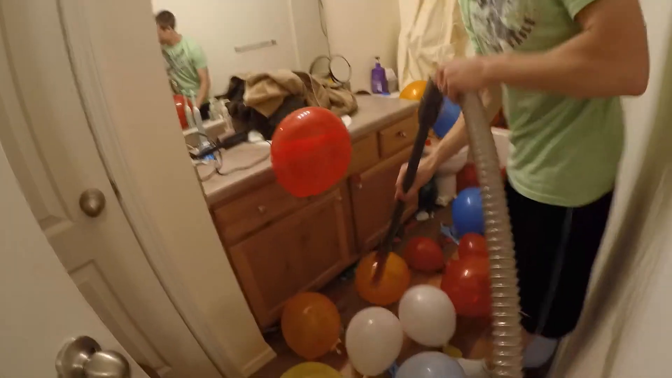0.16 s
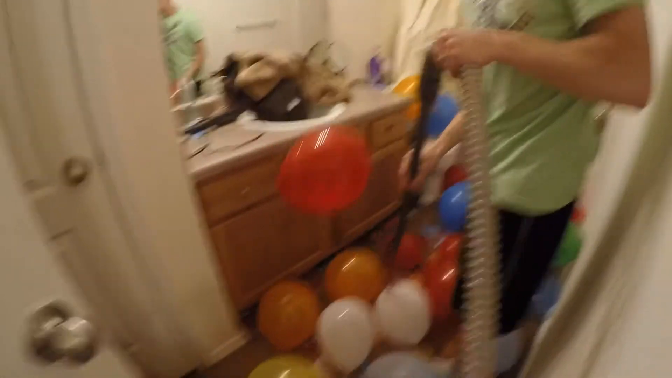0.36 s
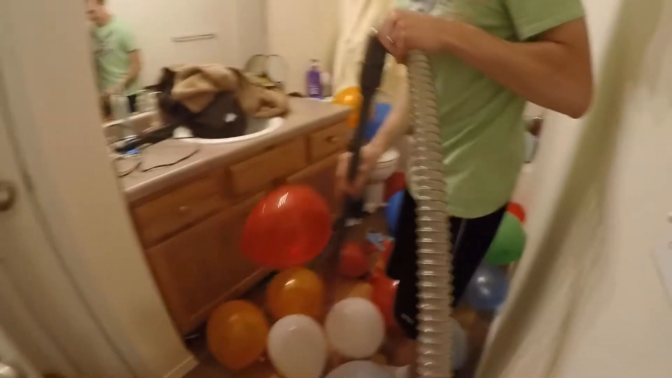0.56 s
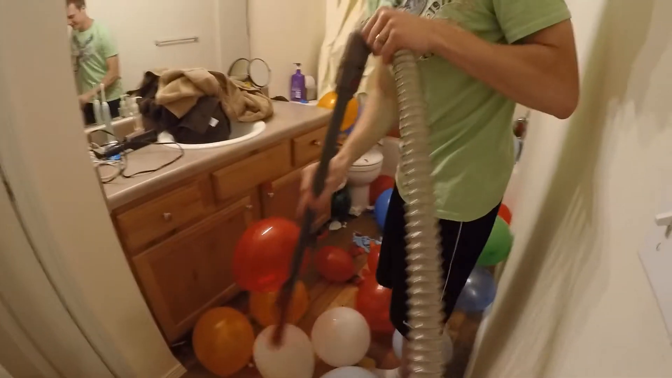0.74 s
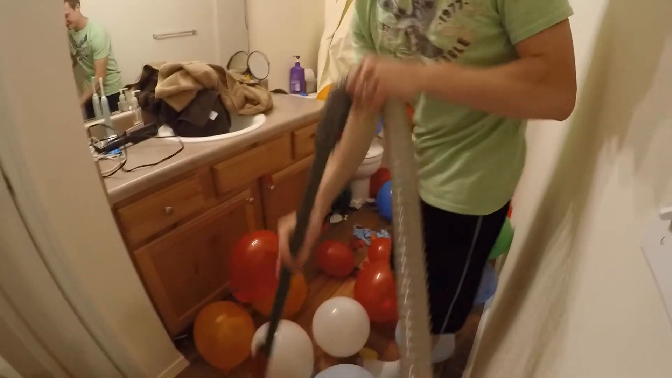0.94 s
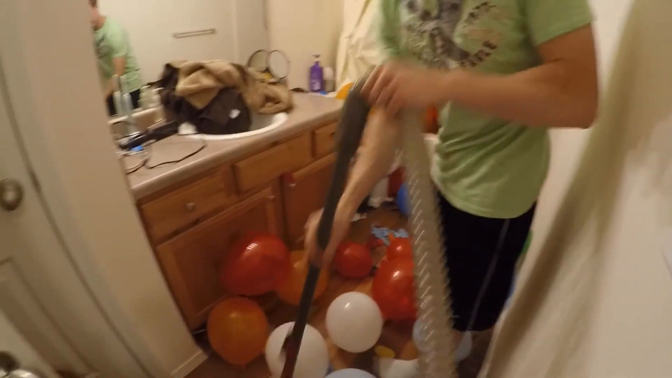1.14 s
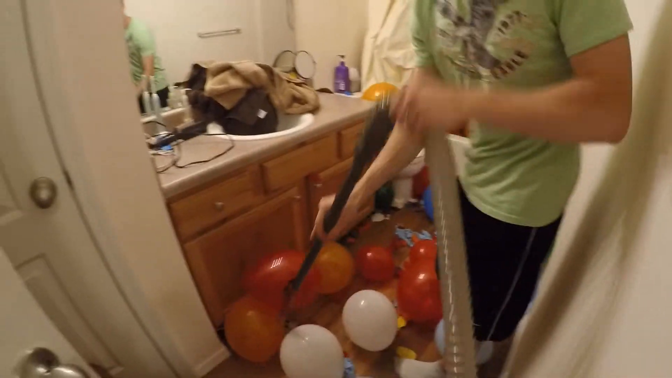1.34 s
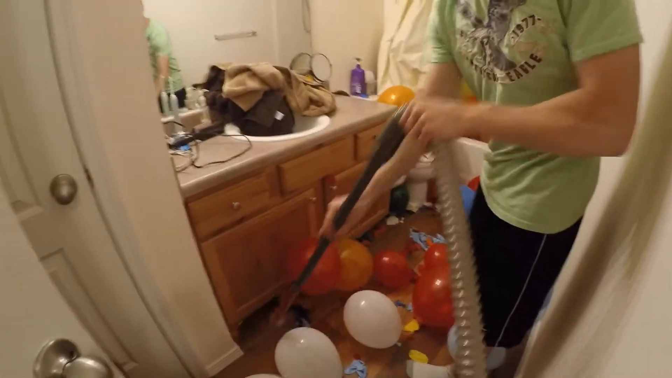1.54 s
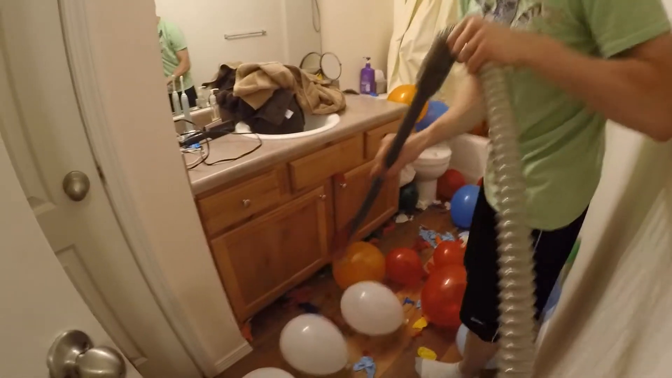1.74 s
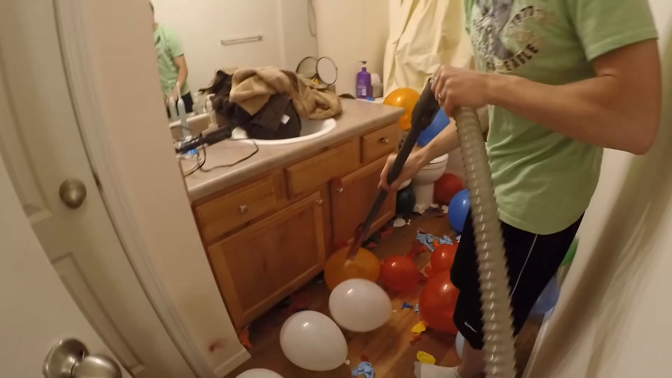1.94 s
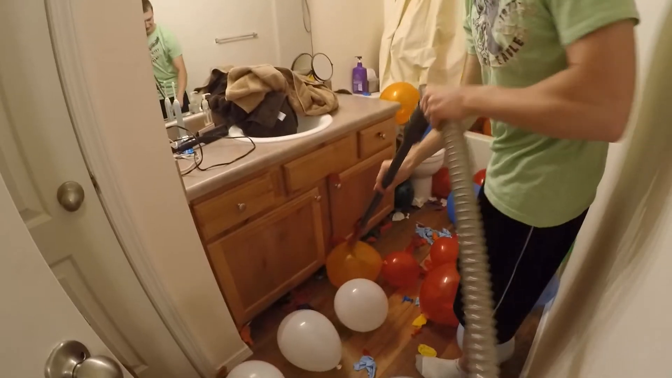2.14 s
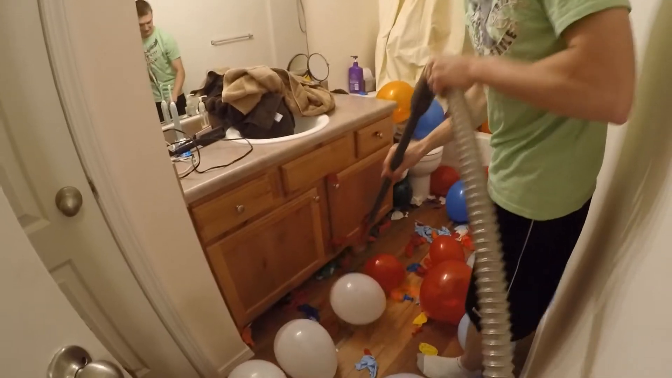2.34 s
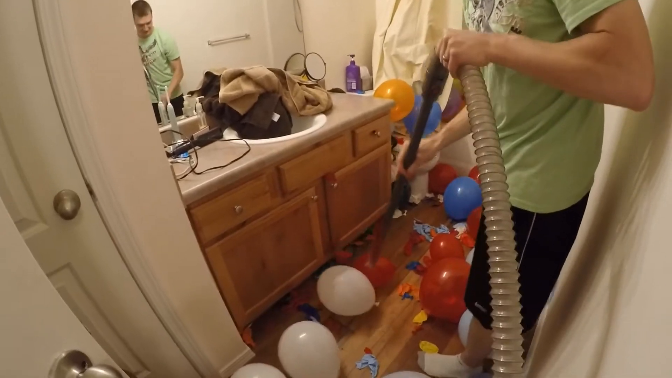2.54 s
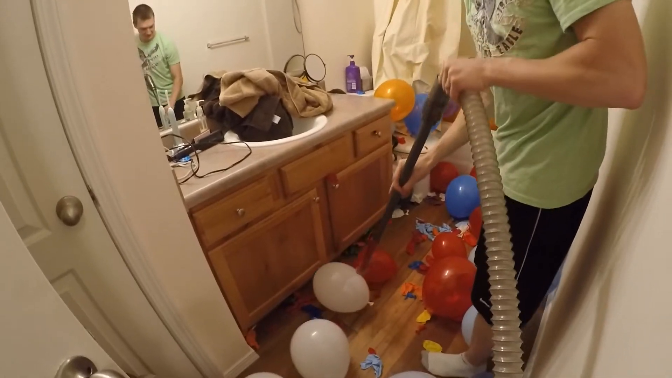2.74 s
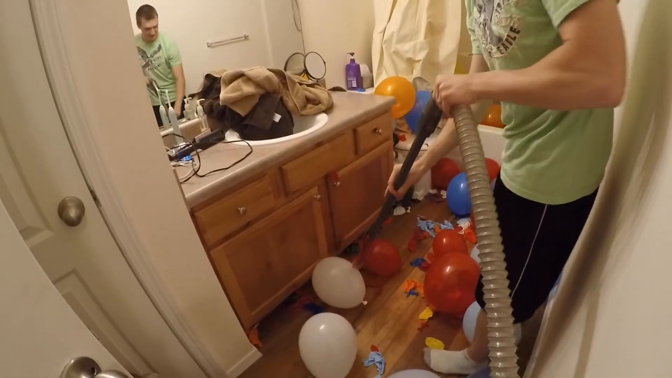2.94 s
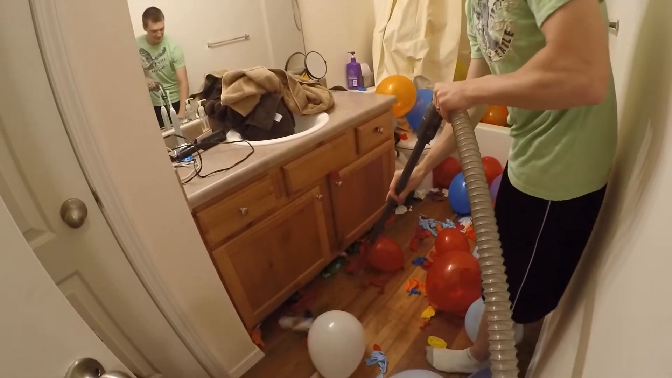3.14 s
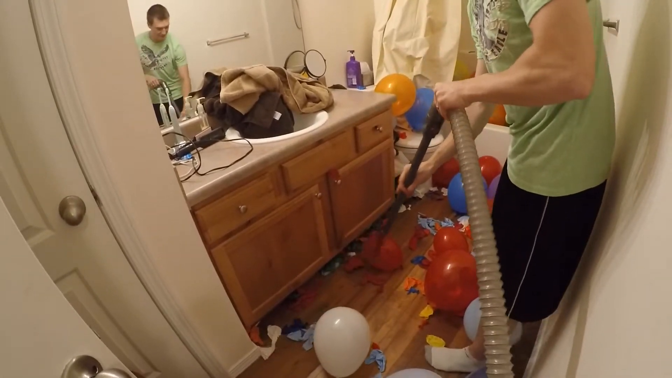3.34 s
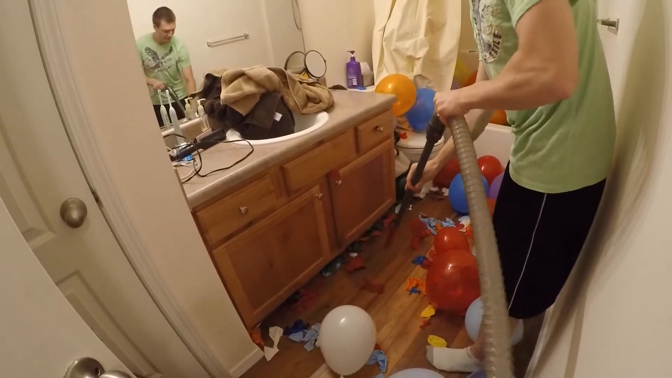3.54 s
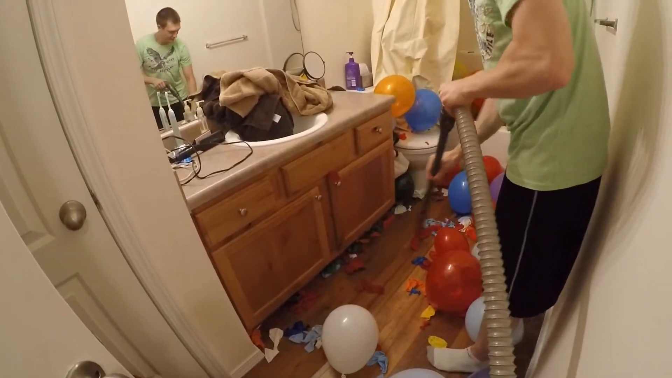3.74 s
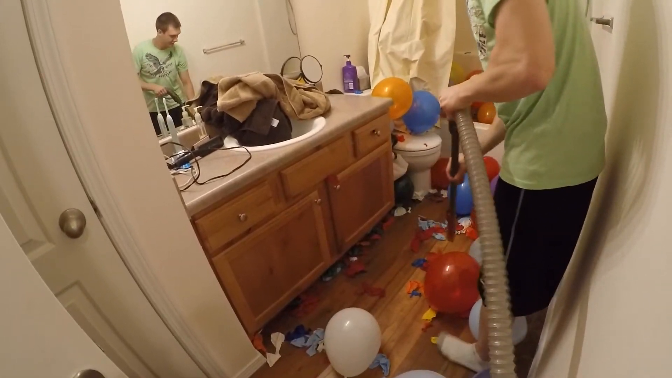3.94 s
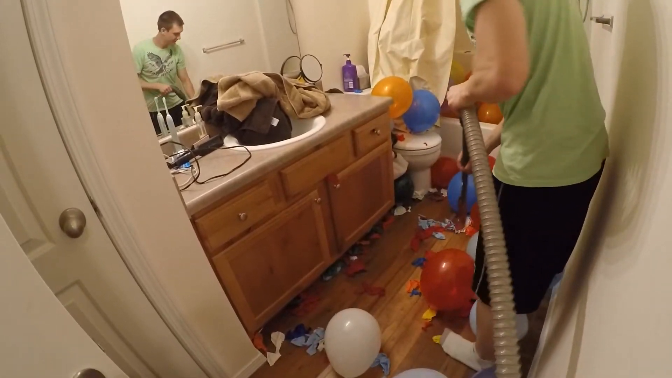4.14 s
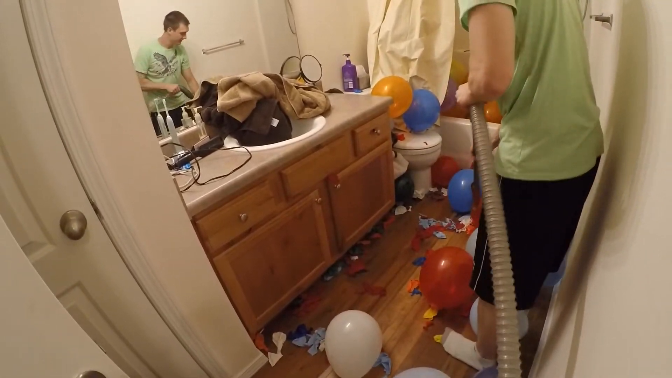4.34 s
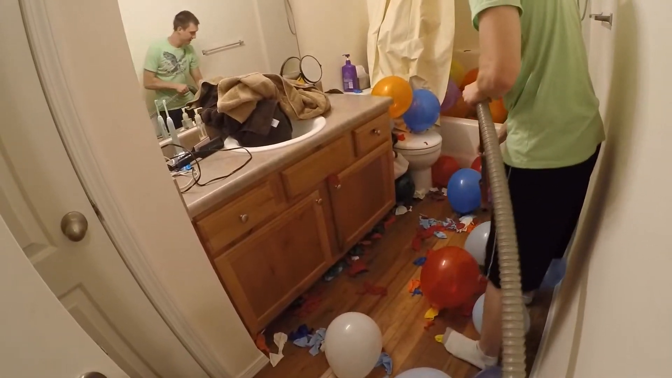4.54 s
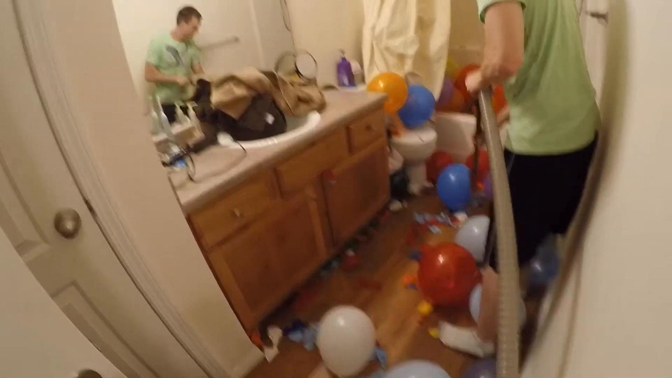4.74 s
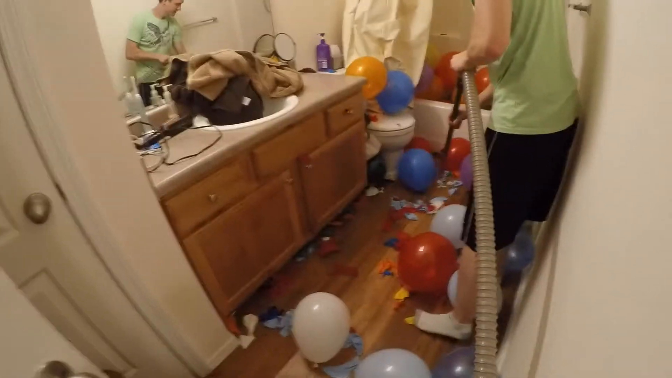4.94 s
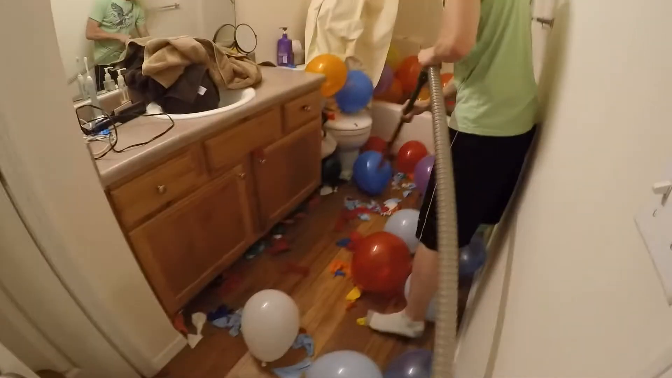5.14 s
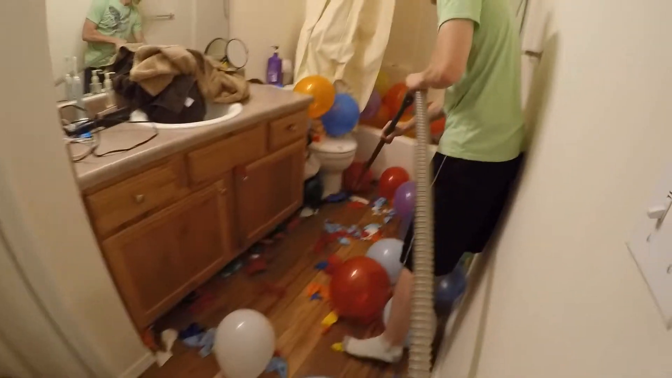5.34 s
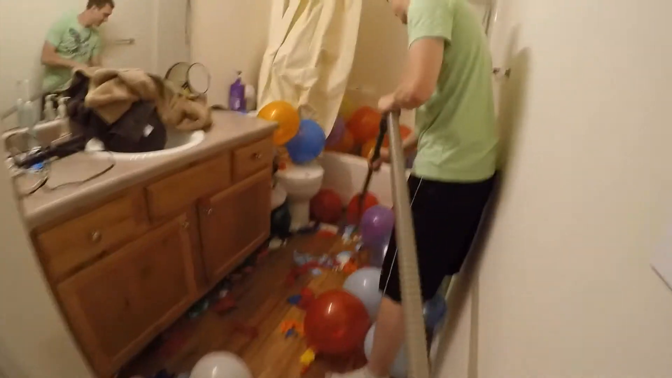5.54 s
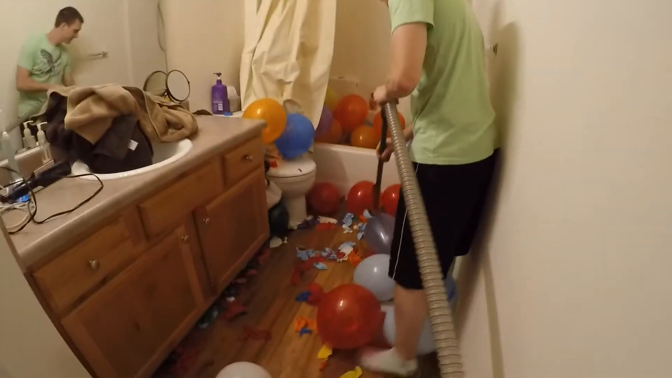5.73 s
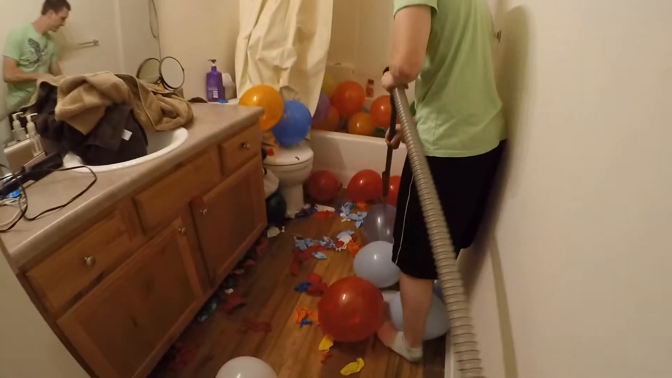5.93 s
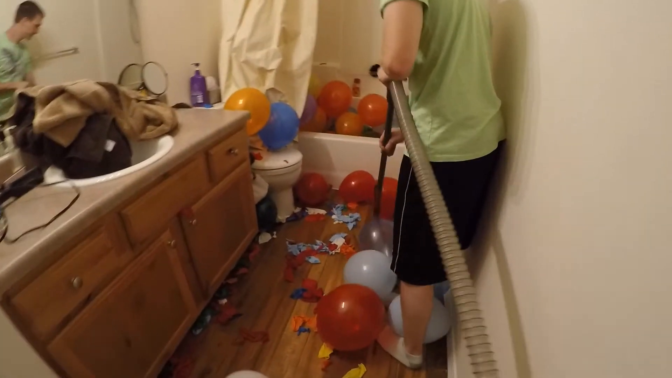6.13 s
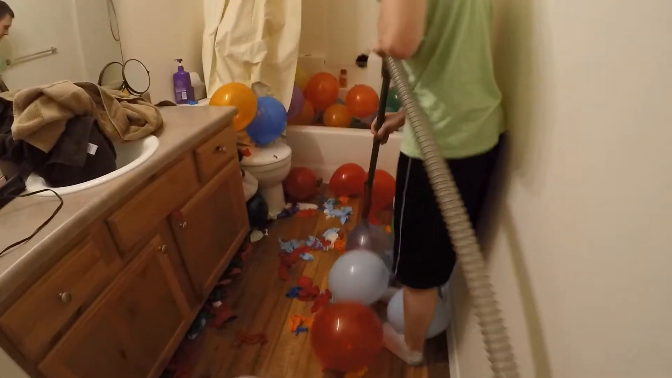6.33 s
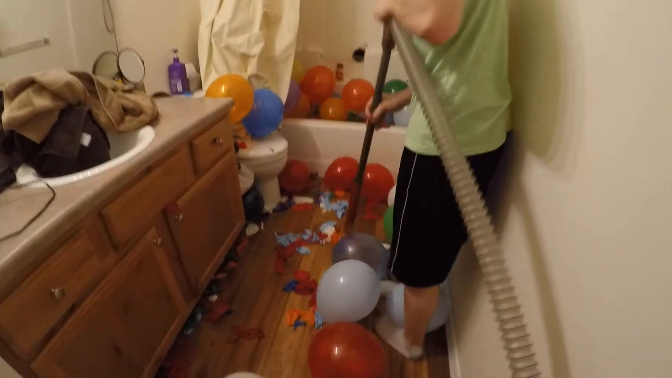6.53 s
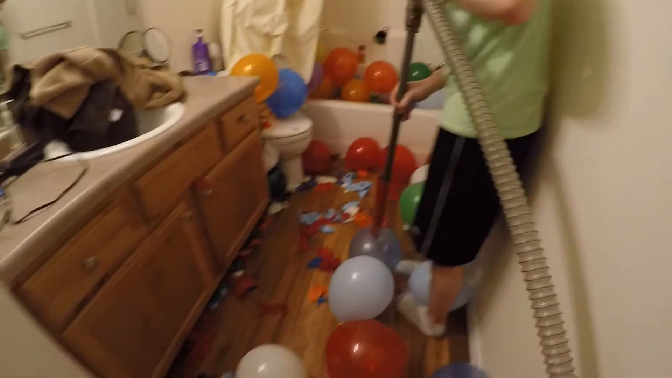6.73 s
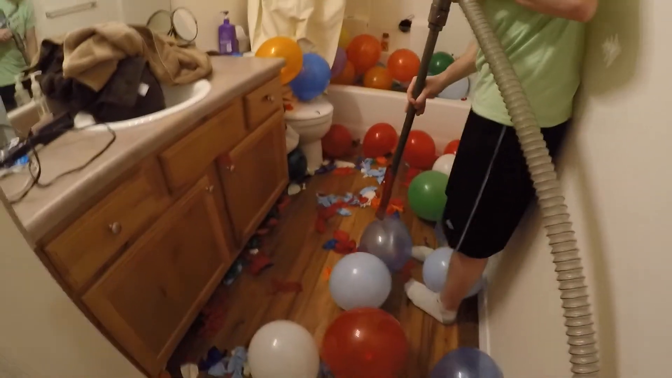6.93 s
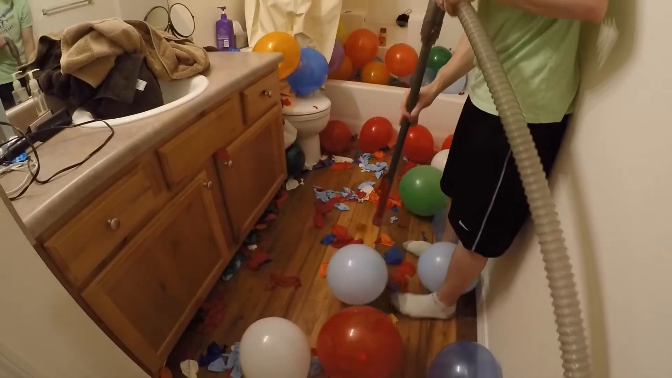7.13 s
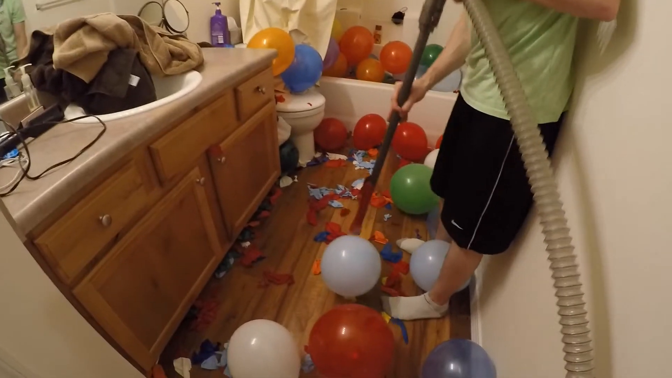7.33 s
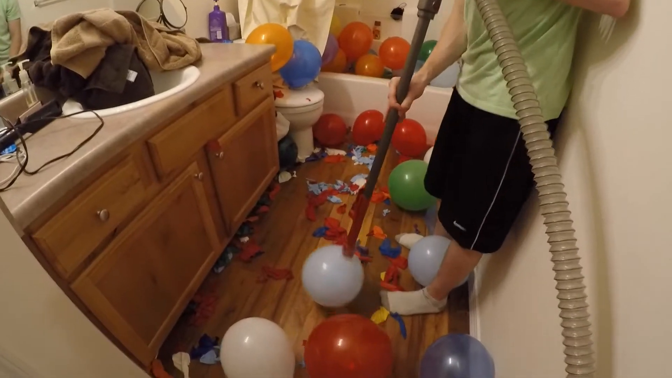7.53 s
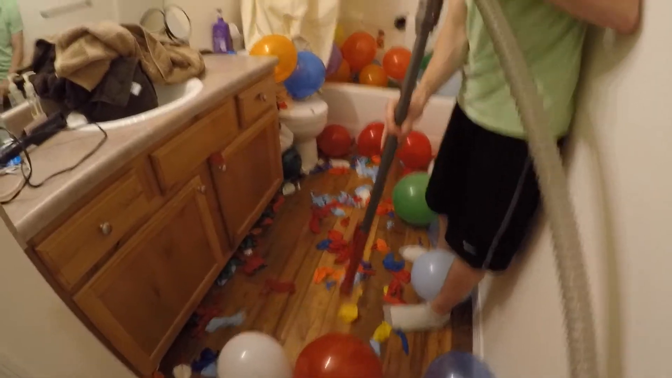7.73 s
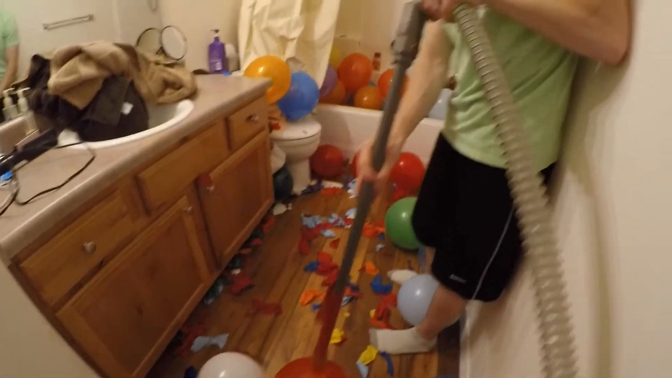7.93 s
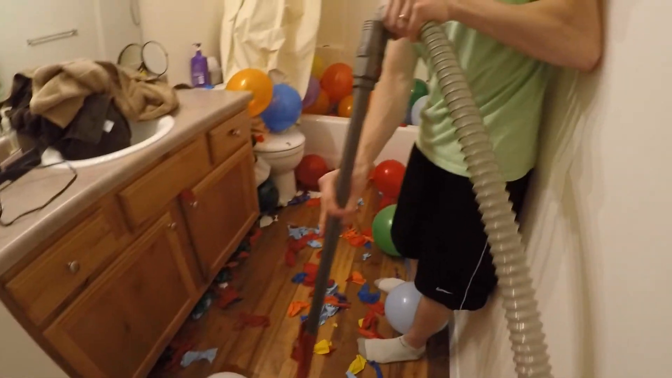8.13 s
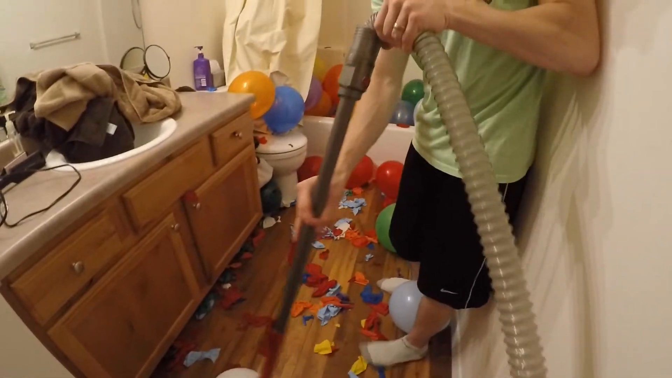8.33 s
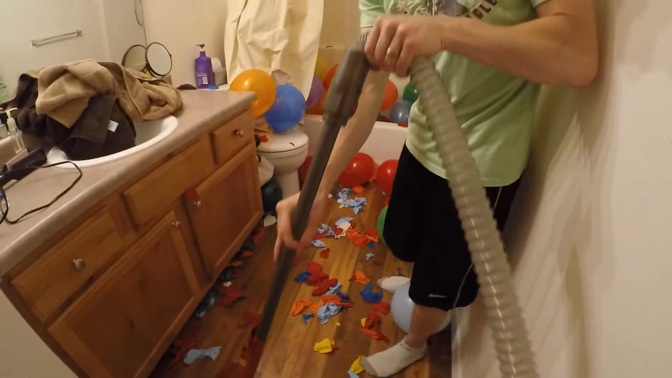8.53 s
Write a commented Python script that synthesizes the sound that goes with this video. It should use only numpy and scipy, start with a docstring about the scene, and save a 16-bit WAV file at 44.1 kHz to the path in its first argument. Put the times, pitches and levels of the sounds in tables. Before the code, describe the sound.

Balloon after balloon pops with a sharp, ringing bang over the rushing air and whine of a running vacuum cleaner.

```python
"""A vacuum cleaner runs in a small bathroom, its wand sucking up balloons and bursting them one by one.
Air roars in the hose and hisses at the nozzle, rushing harder round a caught balloon and sagging while
a torn skin goes down the hose. Each burst is a low thump and a crack that rings in the room; rubber
scraps slap, feet and wand knock. The camera's gain control ducks just ahead of every bang, the peak
clips, and the roar swells back."""
import sys
import numpy as np
from scipy import signal
from scipy.fft import rfft, irfft, next_fast_len
from scipy.io import wavfile
from scipy.ndimage import uniform_filter1d

SR = 44100
rng = np.random.default_rng(int(sys.argv[2]) if len(sys.argv) > 2 else 0)


def wav_record(signal):
    """Record a signal, one row per channel, as 16-bit PCM in the file named by sys.argv[1]."""
    frames = np.transpose(np.atleast_2d(signal))
    bounded = np.clip(frames, -1, 1)
    # unit amplitude maps onto the largest positive 16-bit level
    quanta = np.round(bounded * 32767).astype(np.int16)
    wavfile.write(sys.argv[1], SR, quanta)


N = 382788
TIME = np.arange(N) / SR

# balloon bursts: t/s, thump/Hz, bang/dB, brightness/(dB/octave), knock/Hz, ring/Hz, ring/dB, choke/dB
BURSTS = [(-0.075, 189, -33, -0.5, 351, 1750, -20, 0), (0.9499, 157, -33, -1.6, 323, 1120, -22.5, 3.5),
          (1.3923, 210, -31.5, -1, 477, 1590, -30, 2), (1.7119, 211, -32, 0, 494, 1700, -22.5, 2.5),
          (2.2252, 205, -32.5, 0.67, 454, 1710, -15, -0.5), (3.0593, 188, -33.5, -0.2, 403, 1360, -20, 2),
          (3.439, 220, -33.5, 0, 485, 1640, -19, -0.5), (3.8598, 199, -34, 0, 465, 1470, -15.5, -0.5),
          (4.4651, 201, -30.5, -0.1, 396, 1760, -21.5, 5), (5.2065, 204, -32, 0.2, 474, 1640, -40, 1),
          (5.619, 188, -33, 1.6, 311, 1960, -17, 4), (7.051, 183, -31.5, -0.6, 670, 1420, -15, 7),
          (7.5951, 183, -33, 0, 642, 2000, -22.5, 0.5), (8.004, 149, -33, 0.5, 677, 1600, -19.5, 1.5),
          (8.558, 190, -33.5, -0.6, 555, 1240, -24, -1)]
# how far the wand is turned away toward the tub: t/s, share/0-1
WAND_TURN = [(5.1, 0.55), (5.6, 0.8), (7.0, 0.87), (8.4, 0.5)]


def vacuum_cleaner():
    """One air flow drives the roar, the rush and the tones; the motor hums steadily underneath."""
    # strength of the unblocked flow: t/s, level/dB
    suction = [(0.2, -41), (1.6, -39.5), (2.1, -42.5), (3.0, -41.5), (4.3, -38), (5.6, -39), (6.4, -43.5),
               (7.0, -40), (7.5, -39.5), (8.5, -40)]
    # roar of the air in the hose: f/Hz, density/dB
    hose = [(700, -17), (1080, -11), (1300, -4), (1700, 0.5), (2080, -4), (2220, -5), (2420, -3),
            (2580, -14.5), (3300, -23), (6000, -44)]
    away = automation(WAND_TURN)
    flow = from_db(automation(suction) - choking())
    rush = wand_rush(away) * from_db(catching())
    roar = from_db(-2.9 * away) * airflow(hose, flutter_db=2.5)
    tones = whine_and_whistle(away)
    hum = from_db(-62) * tone(hz=124, waver=0.0035, flicker_db=4)
    return flow * (moving_echoes(roar + rush) + tones) + hum


def wand_rush(away):
    """Air gives body in the wand and hiss at the nozzle; the sizzle fades as the wand turns away."""
    # body of the air in the wand: f/Hz, density/dB
    wand = [(50, -20), (85, -27), (125, -2), (220, -1.5), (480, -3), (640, -1.5), (1000, 3.5), (1300, -8),
            (2500, -33)]
    # hiss at the nozzle: f/Hz, density/dB
    nozzle = [(1200, -14.5), (2600, 2.5), (3700, 0), (5200, 0.5), (8000, -0.5), (10000, -8.5),
              (12000, -6.5), (15500, -25)]
    # top sizzle of the nozzle: f/Hz, density/dB
    nozzle_top = [(5000, -30), (9000, 4), (12000, -1), (15500, -8)]
    body = from_db(-8.5) * airflow(wand, flutter_db=1.3)
    hiss = from_db(-3.9) * airflow(nozzle, flutter_db=0.27)
    sizzle = from_db(-8 - 11 * away) * airflow(nozzle_top, flutter_db=0.5)
    return body + hiss + sizzle


def airflow(spectrum, flutter_db):
    """Fluttering turbulence, coloured by the duct."""
    # resonances of the duct: f/Hz, width/Hz, boost/dB
    duct = [(684, 59, 2), (799, 22, 6.5), (1176, 23, 5.5), (1196, 27, 5), (1357, 51, 7), (1554, 47, 5),
            (1830, 60, 2), (1886, 31, 5.5), (2078, 44, 6), (2420, 78, 2), (4720, 220, 2)]
    size = next_fast_len(N)
    hz = np.arange(size // 2 + 1) * SR / size
    peaks_db = sum(db / (1 + (2 * (hz - centre) / width) ** 2) for centre, width, db in duct)
    colour = from_db(at_hz(spectrum, hz) + peaks_db)
    air = irfft(rfft(rng.standard_normal(size)) * colour, size)[:N]
    return rms_one(air) * from_db(flutter_db * drift(rate=34))


def whine_and_whistle(away):
    """The fan whines; a lower whistle comes forward as the wand turns away."""
    # fan whine against the roar: t/s, level/dB
    whine_levels = [(0.3, -17), (0.9, -8.5), (6.1, -9.5), (7.4, -29)]
    whine = from_db(automation(whine_levels)) * tone(hz=2380, waver=0.0171, flicker_db=4.5)
    whistle = from_db(-26.5 + 12.5 * away) * tone(hz=616, waver=0.008, flicker_db=4)
    return whine + whistle


def catching(seat_s=0.12):
    """Lift of the rush in dB while a balloon settles on the nozzle and narrows it."""
    # caught balloons: start/s, end/s, lift/dB
    catches = [(0.536, 0.95, 2.5), (5.398, 5.62, 2.5), (6.543, 7.05, 0)]
    return sum(db * np.clip((TIME - s) / seat_s + 0.5, 0, 1) * (TIME < end) for s, end, db in catches)


def choking(clear_s=0.38):
    """Loss of flow in dB: each swallowed skin blocks the hose until it has passed."""
    return sum(db * (TIME > s) * np.exp(-((TIME - s) / clear_s) ** 4) for s, *_, db in BURSTS)


def balloons(tear_lead_s=0.0011, snap_lag_s=0.001543, gap_hz=93.5):
    """The skin tears with a tick; a bright snap, the thump and the room follow at once."""
    out, t = np.zeros(N), np.arange(SR // 2) / SR
    for s, thump_hz, bang_db, tilt_db, knock_hz, ring_hz, ring_db, _ in BURSTS:
        tear = from_db(-16.5) * band_noise(480, 1560, len(t)) * decay(t, t60=0.018)
        snap = from_db(-9.5) * band_noise(580, 3700, len(t)) * decay(t, t60=0.0057)
        boom = from_db(33.5) * thump(t, thump_hz)
        room = reverberation(t, tilt_db) + from_db(17.5) * standing_waves(t)
        knock = from_db(13) * hollow_ring(t, knock_hz, width_hz=65, t60=0.26)
        ring = from_db(ring_db) * hollow_ring(t, ring_hz, width_hz=400, t60=0.36)
        add(out, s - tear_lead_s, tear)
        add(out, s + snap_lag_s, snap)
        add(out, s, from_db(bang_db) * (boom + room + knock) + ring)
    # the room carries little just under its first mode
    return signal.lfilter(*signal.iirnotch(gap_hz, Q=4, fs=SR), out + 1e-18)


def thump(t, hz, swell_s=0.0025):
    """The released air overshoots and swings back for two or three cycles."""
    return t / swell_s * np.exp(1 - t / swell_s) * np.sin(2 * np.pi * hz * t)


def hollow_ring(t, hz, width_hz, t60, build_s=0.00033):
    """A hollow resonance of one burst, held by the room."""
    envelope = decay(t, t60) * (1 - np.exp(-t / build_s))
    return band_noise(hz - width_hz / 2, hz + width_hz / 2, len(t)) * envelope


def reverberation(t, tilt_db, pivot_hz=1000, build_s=0.00086, early_db=8.5, early_s=0.0084):
    """Reflections crowd in within milliseconds, then die away band by band."""
    # colour of a burst in the room: f/Hz, density/dB
    colour = [(30, -25), (65, -14), (95, -35), (135, -9), (210, -3.5), (300, -2), (400, -9), (500, -14),
              (850, -15), (1100, -17.5), (1700, -15.5), (2800, -24), (7500, -24.5), (11800, -25.5),
              (15500, -32)]
    # the bathroom's decay: f/Hz, t60/s
    decay_times = [(60, 0.45), (220, 0.29), (600, 0.34), (1600, 0.33), (5000, 0.36), (14000, 0.27)]
    edges = np.geomspace(25, 18000, 25)
    onset = 1 - np.exp(-(t / build_s) ** 2)
    out = 0
    for low, high in zip(edges, edges[1:]):
        hz = np.sqrt(low * high)
        early = from_db(early_db * hz / (hz + 400) * np.exp(-t / early_s))   # first echoes are bright
        envelope = onset * early * decay(t, at_hz(decay_times, hz))
        tail = rms_one(band_noise(low, high, len(t)) * envelope) * np.sqrt(np.mean(envelope ** 2))
        octaves = np.clip(np.log2(hz / pivot_hz), -2, 3)
        out += tail * np.sqrt(high - low) * from_db(at_hz(colour, hz) + tilt_db * octaves)
    return out


def standing_waves(t, build_s=0.01):
    """Each burst comes from another spot and so stirs the room's modes differently."""
    # modes between the walls: f/Hz, level/dB, t60/s
    modes = [(126.7, 0, 0.15), (177.5, 0.5, 0.18), (226.8, -0.5, 0.37), (297.7, -6, 0.3), (503, -13, 0.17),
             (672, -11.5, 0.22)]
    waves = 0
    for hz, db, t60 in modes:
        envelope = from_db(db + rng.standard_normal()) * decay(t, t60)
        waves += envelope * np.sin(2 * np.pi * (hz * t + rng.random()))
    return waves * (1 - np.exp(-t / build_s))


def rubber_slaps():
    """Torn rubber slaps the wand and floor, short and bright."""
    # slaps: t/s, level/dB
    hits = [(0.9555, -6.5), (3.057, -29), (4.441, -35), (4.655, -44), (4.757, -39), (4.871, -37),
            (5.0705, -33), (5.1777, -32), (7.055, -8.5), (7.598, -19), (8.0068, -8.5), (8.522, -32),
            (8.565, -12.5)]
    return contacts(hits, low_hz=2700, high_hz=10500, t60=0.017, room_db=-11, room_t60=0.26)


def dull_knocks():
    """Feet and wand bump with a low thud."""
    # knocks: t/s, level/dB
    hits = [(1.355, -40), (4.315, -42), (4.775, -38), (5.374, -32), (6.244, -42), (6.458, -48),
            (7.195, -44), (8.089, -26.5)]
    return contacts(hits, low_hz=80, high_hz=306, t60=0.13, room_db=-18, room_t60=0.21)


def contacts(hits, low_hz, high_hz, t60, room_db, room_t60):
    """Short blows, each with a faint tail from the room."""
    out, t = np.zeros(N), np.arange(SR // 3) / SR
    envelope = decay(t, t60) + from_db(room_db) * decay(t, room_t60)
    for s, db in hits:
        add(out, s, from_db(db) * band_noise(low_hz, high_hz, len(t)) * envelope)
    return out


def hose_rumble(jostle_db=3.5):
    """The hose rumbles unevenly as it is moved about."""
    # strength of the handling: t/s, level/dB
    handling = [(0.3, -57.5), (2.398, -60), (2.7, -87), (4.3, -56), (5.0, -54), (8.5, -59)]
    # colour of the rumble: f/Hz, density/dB
    colour = [(10, -14), (30, -1), (62, -10.5), (95, -12), (300, -34.5)]
    level_db = automation(handling) + jostle_db * drift(rate=4.4)
    return from_db(level_db) * airflow(colour, flutter_db=0.5)


def moving_echoes(x, strength=0.11, slide_s=0.000198, count=12):
    """Wall echoes comb the roar; their delays slide as the wand moves about."""
    delays_s = rng.uniform(0.015, 0.06, count)
    echoes = sum(np.interp(TIME - d - slide_s * drift(rate=1.5), TIME, x, left=0) for d in delays_s)
    return (x + strength * echoes) / np.sqrt(1 + count * strength ** 2)


def body_shade(x, shelf_hz=10000, shelf_db=-9):
    """As the wand turns away, the body shades the top of every sound."""
    dull = signal.sosfiltfilt(signal.butter(3, shelf_hz, fs=SR, output="sos"), x)
    return dull + from_db(shelf_db * automation(WAND_TURN)) * (x - dull)


def gain_control(x, target_db=-3, start_db=2.5, max_db=17, release_db_per_s=11.5):
    """The gain ducks just ahead of a bang and climbs back at a steady rate."""
    window_s, attack_s, look_ahead_s = 0.0033, 0.0047, 0.0135
    power = uniform_filter1d(x ** 2, round(window_s * SR))
    level_db = 10 * np.log10(np.maximum(power, 1e-12))
    coming_db = np.interp(TIME + look_ahead_s, TIME, level_db)
    allowed_db = np.clip(target_db - coming_db, 0, max_db)
    climb_db = release_db_per_s * TIME
    gain_db = np.minimum(np.minimum.accumulate(allowed_db - climb_db), start_db) + climb_db
    return x * from_db(uniform_filter1d(gain_db, round(attack_s * SR)))


def tone(hz, waver, flicker_db):
    """A sine that wavers in pitch (as a share) and in level; rms 1."""
    phase = 2 * np.pi * np.cumsum(hz * (1 + waver * drift(rate=70))) / SR
    return rms_one(np.sin(phase) * from_db(flicker_db * drift(rate=26)))


def band_noise(low_hz, high_hz, size):
    """Band-passed noise, already settled; rms 1."""
    sos = signal.butter(2, [low_hz, high_hz], "band", fs=SR, output="sos")
    return rms_one(signal.sosfilt(sos, rng.standard_normal(size + SR // 10))[-size:])


def drift(rate):
    """A random wander that glides to a new value `rate` times a second."""
    knots = np.arange(0, N / SR + 1, 1 / rate)
    return np.interp(TIME, knots, rng.standard_normal(len(knots)))


def decay(t, t60):
    """An envelope that loses 60 dB in t60 seconds."""
    return from_db(-60 * t / t60)


def automation(points):
    """Straight ramps between (time, value) points."""
    return np.interp(TIME, *np.transpose(points))


def at_hz(points, hz):
    """Read a curve along log frequency."""
    freqs, values = np.transpose(points)
    return np.interp(np.log(np.maximum(hz, 1)), np.log(freqs), values)


def from_db(db):
    """Decibels to gain."""
    return 10 ** (np.asarray(db) / 20)


def rms_one(x):
    """Scale to rms 1."""
    return x / np.sqrt(np.mean(x ** 2) + 1e-20)


def add(track, s, sound):
    """Mix a sound in at a time, trimmed to the track."""
    at = round(s * SR)
    sound, at = sound[max(-at, 0):], max(at, 0)
    track[at:at + len(sound)] += sound[:N - at]


def scene():
    """Rubber scraps, knocks and bangs over the running cleaner and its rumbling hose."""
    mix = rubber_slaps() + dull_knocks() + balloons() + vacuum_cleaner() + hose_rumble()
    return body_shade(mix)[None]


def record(dry, ceiling=0.98, cutoff_hz=15500):
    """Gain control, overload on the first swings of each bang, and a steep treble cut."""
    x = gain_control(dry[0])
    clipped = x / (1 + (x / ceiling) ** 8) ** (1 / 8)
    treble_cut = signal.ellip(12, 0.1, 80, cutoff_hz, fs=SR, output="sos")
    return signal.sosfilt(treble_cut, clipped)[None]


dry = scene()
out = record(dry)
wav_record(out)
```